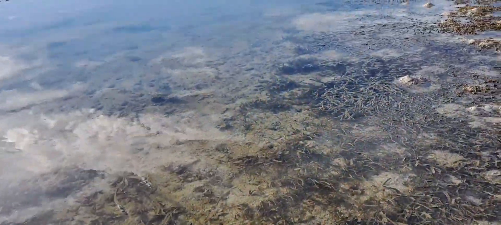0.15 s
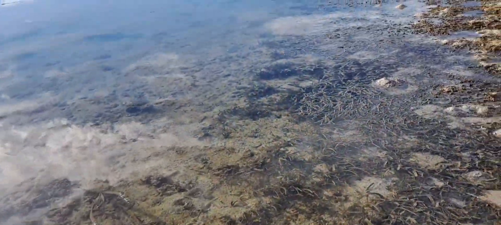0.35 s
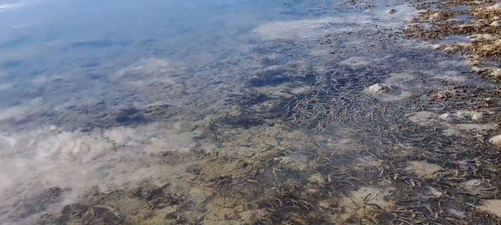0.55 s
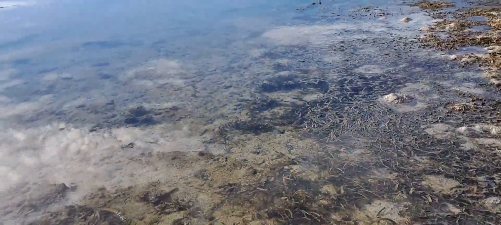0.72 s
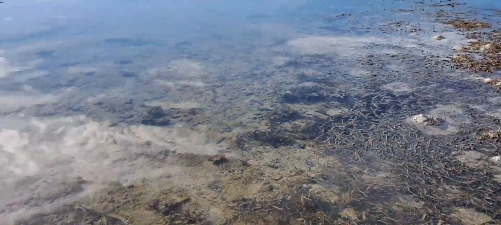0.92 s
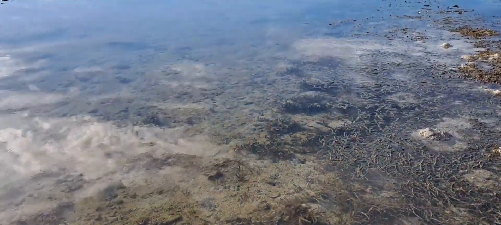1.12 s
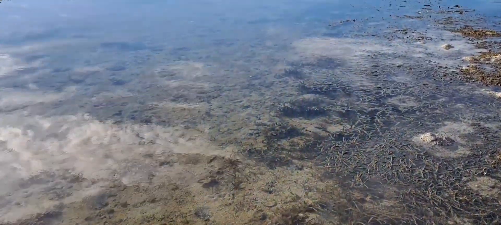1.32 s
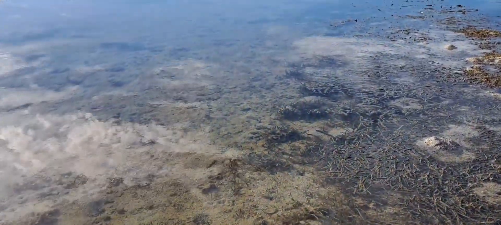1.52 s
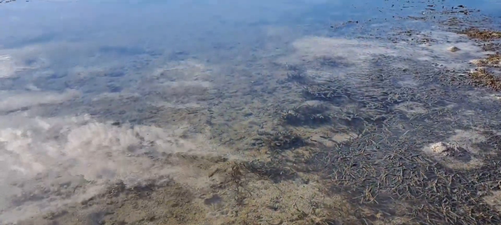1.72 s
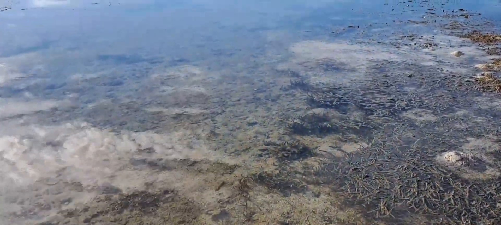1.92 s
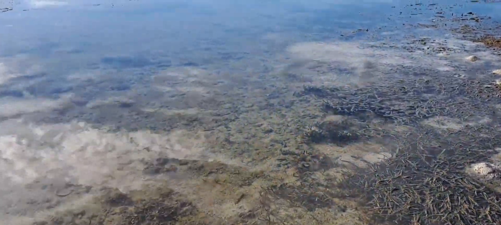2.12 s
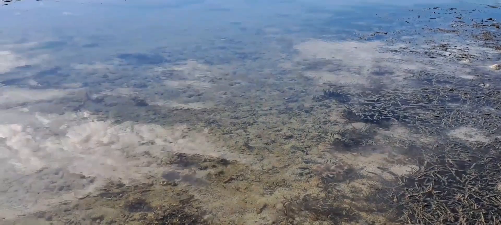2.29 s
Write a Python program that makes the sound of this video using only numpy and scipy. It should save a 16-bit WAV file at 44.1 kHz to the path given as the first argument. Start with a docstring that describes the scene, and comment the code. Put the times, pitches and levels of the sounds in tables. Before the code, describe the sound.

Two wading strides slosh and swish through shallow water, bubbles gulping, droplets plinking, low air thumps

```python
"""Shallow seawater on an open coast: someone wades two strides, the first sounds being an earlier sweep.
Each leg sweep folds air into the water, heard as ringing bubbles (gulps and dense swarms), and throws
a fizzing spray, mostly to the right; single drops plink and foam ticks. Late in each stride a puff
of air, made of band-limited noise and short pulses, buffets the left microphone port with a dull thump.
A low, steady rumble of the coast lies beneath."""
import sys
import numpy as np
from scipy import signal
from scipy.fft import rfft, irfft, next_fast_len
from scipy.io import wavfile
from scipy.ndimage import uniform_filter1d, map_coordinates

SR = 44100
rng = np.random.default_rng(int(sys.argv[2]) if len(sys.argv) > 2 else 0)


def to_wav(sig):
    """Store sig (one row per channel, or 1-D mono) as 16-bit WAV at the path in sys.argv[1].

    Samples outside -1..1 are clipped; the rate is SR.
    """
    pcm = np.clip(np.atleast_2d(sig), -1, 1) * 32767
    pcm = np.round(pcm).astype(np.int16)
    wavfile.write(sys.argv[1], SR, pcm.T)  # frames by channels


N = 103635

# Spectral envelopes of the coast and of the four water layers, from large bubbles to droplets.
# Each row: frequency in Hz, relative gain in dB.
SHORE_SPECTRUM = [(20, -5.5), (85, -8.5), (125, -1), (180, -10), (600, -22), (16000, -81)]
SLOSH_SPECTRUM = [(180, -7), (400, -4), (700, 0.5), (1050, -2), (2500, -25.5)]
SPLASH_SPECTRUM = [(450, -49), (850, -7), (1350, 7.5), (2000, 7), (4500, -17)]
FIZZ_SPECTRUM = [(1200, 4), (2050, -12), (2500, 0), (4500, -1), (5800, 2.5), (6700, -9), (13000, -44)]
CRACKLE_SPECTRUM = [(2500, 2.5), (6500, 4.5), (9500, -4), (13000, 9.5), (16000, -12)]
# Puffs of air on the left port.
# Each row: peak time in seconds, level in dB, rise in seconds, fall in seconds, upper turbulence edge in Hz.
AIR_PUFFS = [(0.825, -24.5, 0.011, 0.028, 215), (.868, -19.5, 0.015, 0.015, 79),
             (0.899, -18, 0.015, 0.011, 292), (0.931, -19, 0.028, 0.025, 168),
             (0.996, -31, 0.039, .018, 69.4), (1.894, -18, 0.022, 0.044, 247),
             (1.953, -14, 0.022, .018, 79), (2.021, -26, 0.016, 0.023, 131),
             (2.069, -28.5, 0.0086, 0.038, 112)]
# Sharp eddies inside the puffs. Each row: centre time in seconds, pitch in Hz, level in dB.
AIR_EDDIES = [(0.866, 54, -14), (.887, 316, -18), (0.895, 240, -15), (0.916, 55.6, -15), (0.933, 75, -14.5),
              (.9385, 318, -20), (1.8803, 284, -6), (1.949, 59.7, -10.5)]
# Bursting foam and sharp spatter.
# Each row: start in seconds, level in dB before the band filter, band centre in Hz.
FOAM_TICKS = [(0.3641, -20.5, 9000), (0.969, -33, 9000), (1.001, -41, 5000), (1.0781, -25, 1390),
              (1.106, -33.5, 3480), (1.3222, -18.5, 1510), (1.334, -36, 12000), (2.097, -32, 4200),
              (2.113, -25.5, 3670), (2.1913, -30, 3460), (2.202, -27.5, 2960)]
# Drops that strike the water. Each row: start in seconds, ring in Hz, level in dB before panning.
WATER_DROPS = [(.3412, 2110, -22.5), (.4562, 2310, -24), (.586, 2020, -28), (1.2938, 3100, -30),
               (1.3198, 2900, -23.5), (1.3246, 3200, -24), (1.6935, 5500, -11)]
# Single large bubbles. Each row: start in seconds, initial pitch in Hz, level in dB, life in seconds.
LARGE_BUBBLES = [(.229, 323, -27.5, 0.049), (.262, 307, -33, 0.064), (.378, 324, -36, 0.058),
                 (.499, 800, -31, 0.011), (.551, 673, -22.5, 0.019), (.611, 1185, -32, 0.014),
                 (.683, 1324, -25.5, 0.0072), (.686, 529, -24.5, 0.014), (.717, 484, -28.5, 0.024),
                 (.758, 412, -20.5, 0.012), (.902, 1500, -26, 0.0041), (0.9317, 1130, -23, 0.0055),
                 (.9695, 1010, -30.5, 0.012), (1.294, 805, -31, 0.0035), (1.3218, 580, -21.5, 0.0046),
                 (1.366, 485, -32, 0.042), (1.417, 1450, -25, 0.0052), (2.062, 1460, -27.5, .008),
                 (2.128, 860, -35.5, 0.019), (2.162, 1490, -35, 0.0049)]
# The leg dragging through the water. Each row: start in seconds, stop in seconds, settling in dB per second,
# later trickle in dB relative to the sweep, then levels in dB of slosh, splash, fizz and crackle;
# the settling and the trickle are further weighted by the two lists below.
LEG_SWEEPS = [(-.1, 0.175, 160, -28, -53, -51.5, -50, -51),
              (0.197, 0.945, 201, -11.5, -49, -45.5, -48.5, -54),
              (1.299, 2.008, 65.5, -35, -46.5, -54, -47, -54)]
# Large bubbles die out first. In order: relative settling speed of slosh, splash, fizz and crackle.
SETTLING_RATIO = [2.1, 0.93, 1.1, 0.88]
# The trickle holds few large bubbles. In order: tilt in dB of slosh, splash, fizz and crackle.
TRICKLE_TILT = [-10, -5.5, 1.5, 2.5]
# Water thrown up by the foot, and its patter falling back. Each row: peak time in seconds,
# half length in seconds, then levels in dB of slosh, splash, fizz and crackle.
THROWN_WATER = [(.83, 0.055, -44, -69, -49, -46.5), (1.785, 0.029, -46, -44.5, -46.5, -45.5),
                (1.93, 0.082, -41.5, -41.5, -38, -43.5), (2.103, 0.0093, -51, -44, -42.5, -45)]
# The bow wave folds over and gurgles.
# Each row: peak time in seconds, half length in seconds, levels in dB of slosh and splash.
BOW_GURGLES = [(0.131, 0.0097, -75, -40.5), (0.237, 0.031, -44, -47), (0.344, 0.022, -60, -43.5),
               (0.496, 0.015, -34.5, -44), (0.54, 0.031, -35, -66), (0.61, 0.021, -36, -45),
               (0.685, 0.019, -37, -41.5), (1.502, 0.014, -41, -44.5), (1.589, 0.029, -42, -41),
               (1.71, 0.043, -50, -45)]

SHORE_DB = -54.5
SWISH_S, SWISH_HALF_S = 1.485, .075
SWISH_DB, SWISH_HZ, SWISH_OCTAVES = -45, 3900, 0.37
AIR_LOW_HZ, AIR_SLOPE = 38.6, 3.9  # lower edge, exponent of the upper roll-off
TICK_DECAY_S, TICK_WIDTH = 0.00084, 2.6  # width: ratio of band edge to centre
DROP_LIFE_S, DROP_RIGHT_DB = 0.0022, 16.5
GULP_RISE_OCT_PER_S, GULP_ROUGH = 15, .22  # initial pitch rise, depth of amplitude roughness
PINCH_S, PINCH_CYCLES = .0005, .6  # bubble onset: fixed time plus a number of its own cycles
SWEEP_ATTACK_S, TRICKLE_DB_PER_S = 0.031, 10.5
MIC_LOW_HZ, TOP_HZ = 33, 16200


def amp(db):
    """Level law: decibels to amplitude gain."""
    return 10 ** (np.asarray(db) / 20)


def unit(x):
    """Power normalisation: scale to rms 1."""
    return x / np.sqrt(np.mean(x ** 2) + 1e-20)


def wobble(rate):
    """Random modulation: smooth interpolation through rate random knots a second."""
    knots = rng.standard_normal(int(N * rate / SR) + 4)
    return map_coordinates(knots, [np.arange(N) * rate / SR])


def swell(s, half):
    """Gaussian envelope: a smooth rise and fall around time s."""
    return np.exp(-((np.arange(N) / SR - s) / half) ** 2 / 2)


def filtered(x, response):
    """Linear filtering: multiply the spectrum of x by a response of frequency."""
    m = next_fast_len(N + SR // 2)
    return irfft(rfft(x, m) * response(np.fft.rfftfreq(m, 1 / SR)), m)[..., :N]


def coloured(x, points):
    """Spectral shaping: x through a curve drawn on log frequency, at rms 1."""
    f, db = np.transpose(points)
    return unit(filtered(x, lambda hz: amp(np.interp(np.log(hz + 1), np.log(f), db))))


def sides(right_db):
    """Interaural level difference: left and right gains whose ratio is right_db."""
    return amp(np.array([[-.5], [.5]]) * right_db)


def add(out, s, x):
    """Superposition: mix x into out at time s."""
    i = int(np.clip(round(s * SR), 0, N - 1))
    out[..., i:i + x.shape[-1]] += x[..., :N - i]


def shore():
    """Partly coherent noise: the low, steady rumble of the open coast."""
    common = rng.standard_normal(N)
    apart = 0.26 * rng.standard_normal((2, N))
    return amp(SHORE_DB) * coloured(common + apart, SHORE_SPECTRUM)


def swish():
    """Band-limited flow noise: a soft band of hiss as the foot slides in."""
    def band(hz):
        return np.exp(-(np.log2((hz + 1) / SWISH_HZ) / SWISH_OCTAVES) ** 2 / 2)
    hiss = unit(filtered(rng.standard_normal((2, N)), band))
    return hiss * amp(SWISH_DB) * swell(SWISH_S, SWISH_HALF_S) * sides(17.0)


def buffets(leak_db=-36):
    """Turbulent pressure on the left port, its band edge set per puff; little reaches the right one."""
    t, air = np.arange(N) / SR, np.zeros(N)
    for s, db, rise, fall, edge in AIR_PUFFS:
        def band(hz):
            return 1 / (1 + (AIR_LOW_HZ / (hz + 1)) ** 4) / (1 + (hz / edge) ** AIR_SLOPE)
        churn = filtered(rng.standard_normal(N), band)
        # Even out the running power, so that the envelope alone sets the level.
        churn = churn / np.sqrt(np.abs(uniform_filter1d(churn ** 2, size=1300)) + 1e-9)
        envelope = np.exp(-np.abs((t - s) / np.where(t < s, rise, fall)) ** 1.5)
        air += churn * amp(db) * envelope
    for s, hz, db in AIR_EDDIES:
        u = (np.pi * hz * (t - s)) ** 2
        air += amp(db) * (1 - 2 * u) * np.exp(-u)  # a single pulse with a dip on each side
    return np.array([air, amp(leak_db) * air])


def bubble(hz, life, rise, delay=0):
    """Damped volume resonance: a bubble pinches off, dies away and rises in pitch as it nears the surface."""
    t = np.maximum(np.arange(int(2 * life * SR) + 30) / SR - delay, 0)
    phase = 2 * np.pi * hz * t * (1 + rise * np.log(2) * t / life / 2)
    pinch = 1 - np.exp(-t / (PINCH_S + PINCH_CYCLES / hz))
    decay = np.exp(-2 * t / life) * np.clip(2 - t / life, 0, 1)
    return np.sin(phase) * pinch * decay


def ticks():
    """Impulsive rupture: foam and spatter as decaying noise bursts through a band filter."""
    out, t = np.zeros((2, N)), np.arange(SR // 50) / SR
    for s, db, hz in FOAM_TICKS:
        burst = np.exp(-t / TICK_DECAY_S) * rng.standard_normal((2, len(t)))
        edges = [hz / TICK_WIDTH, min(hz * TICK_WIDTH, TOP_HZ)]
        b, a = signal.butter(4, edges, 'band', fs=SR)
        add(out, s, amp(db) * sides(2.7) * signal.lfilter(b, a, burst))
    return out


def drops():
    """Impact resonance: near drops plink as short rings, well to the right."""
    out = np.zeros((2, N))
    for s, hz, db in WATER_DROPS:
        add(out, s, amp(db) * sides(DROP_RIGHT_DB) * bubble(hz, DROP_LIFE_S, rise=0.14))
    return out


def gulps():
    """Cavity closure: pockets of air close behind the leg and ring, roughened in amplitude."""
    out = np.zeros(N)
    for s, hz, db, life in LARGE_BUBBLES:
        add(out, s, amp(db) * bubble(hz, life, GULP_RISE_OCT_PER_S * life))
    return out * (1 + GULP_ROUGH * wobble(400))


def swarm(per_s, low_hz, high_hz, cycles, rise, scatter_db, spread_s):
    """Superposed resonances: bubbles of random size and place, with stereo time and level differences."""
    out = np.zeros((2, N))
    for when, size, life, strength, place, pan in rng.random((int(per_s * N / SR), 6)):
        hz = low_hz * (high_hz / low_hz) ** size
        # Only the farther side is delayed.
        delay = np.maximum(np.array([[1], [-1]]) * (2 * place - 1) * spread_s, 0)
        ring = bubble(hz, cycles * (.5 + life) / hz, rise, delay)
        gain = amp(-scatter_db * np.log(0.026 + strength))
        add(out, when * N / SR, ring * gain * sides(5 * (pan - .5)))
    return out


def water(bubbles, colour, wash_db, flutter_db, alike=0):
    """Incoherent sum: distinct bubbles on a wash of countless faint ones, fluttering as the water breaks."""
    common = np.clip(alike, 0, 1)  # share of the wash power common to both sides
    wash = np.sqrt(common) * rng.standard_normal(N) + np.sqrt(1 - common) * rng.standard_normal((2, N))
    mixture = coloured(bubbles, colour) + amp(wash_db) * coloured(wash, colour)
    return unit(mixture * amp(flutter_db * wobble(60.246)))


def spray(fizz, crackle):
    """High-pitched small resonators: fizz of tiny bubbles and the crackle of droplets landing."""
    tiny = swarm(per_s=4000, low_hz=1980, high_hz=7037, cycles=14.7, rise=.02,
                 scatter_db=2.6, spread_s=0.000434)
    droplets = swarm(per_s=900, low_hz=4720, high_hz=13700, cycles=1.65, rise=0,
                     scatter_db=8, spread_s=0.000442)
    return (fizz * water(tiny, FIZZ_SPECTRUM, wash_db=-4.5, flutter_db=1.5) * sides(11.1)
            + crackle * water(droplets, CRACKLE_SPECTRUM, wash_db=0, flutter_db=2.5) * sides(4.1))


def slosh(low, mid):
    """Air entrainment: large bubbles ring low and small ones higher as the leg folds them in."""
    large = swarm(per_s=650, low_hz=340.8, high_hz=1105.5, cycles=12.96, rise=0.314,
                  scatter_db=3.0, spread_s=0.00015)
    small = swarm(per_s=1100, low_hz=788.6, high_hz=2676, cycles=16, rise=0.16,
                  scatter_db=4, spread_s=0.00029)
    return (low * water(large, SLOSH_SPECTRUM, wash_db=-7.5, alike=0.92, flutter_db=1.5)
            + mid * water(small, SPLASH_SPECTRUM, wash_db=-5, alike=0.33, flutter_db=2.8))


def agitation():
    """Addition of powers: sweeps, thrown water and gurgles set the slosh, splash, fizz and crackle."""
    t, power = np.arange(N) / SR, np.zeros((4, N))
    for start, stop, settle, trickle_db, *levels in LEG_SWEEPS:
        after = np.maximum(t - stop, 0)
        attack = (1 + np.tanh((t - start) / SWEEP_ATTACK_S)) / 2
        settling = amp(-settle * np.outer(SETTLING_RATIO, after))
        trickle = np.outer(amp(TRICKLE_TILT), amp(trickle_db - TRICKLE_DB_PER_S * after))
        power += (amp(levels)[:, None] * attack * np.maximum(settling, trickle)) ** 2
    for s, half, *levels in [*THROWN_WATER, *BOW_GURGLES]:
        power[:len(levels)] += np.outer(amp(levels), swell(s, half)) ** 2
    return np.sqrt(power)


def scene():
    """Linear superposition: coast, air and water together in the open."""
    low, mid, fizz, crackle = agitation()
    background = shore() + swish() + buffets()
    single_events = ticks() + drops() + gulps()
    return background + single_events + spray(fizz, crackle) + slosh(low, mid)


def record(dry):
    """Band limitation: the microphone loses the deepest bass, and nothing passes above TOP_HZ."""
    return filtered(dry, lambda hz: (hz < TOP_HZ) / (1 + (MIC_LOW_HZ / (hz + 1)) ** 6))


dry = scene()
out = record(dry)
to_wav(out)
```